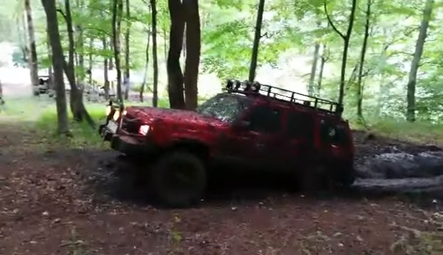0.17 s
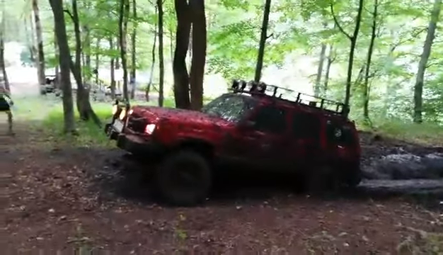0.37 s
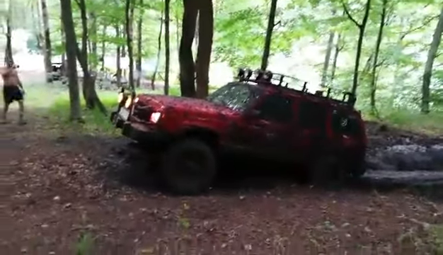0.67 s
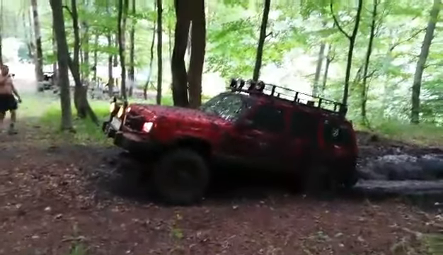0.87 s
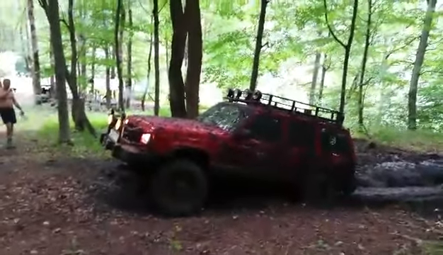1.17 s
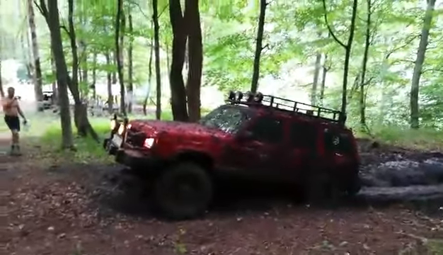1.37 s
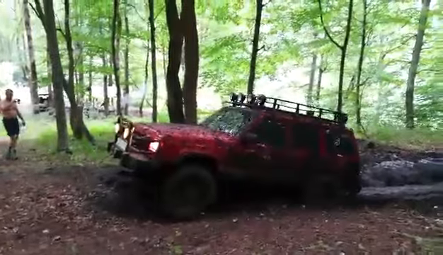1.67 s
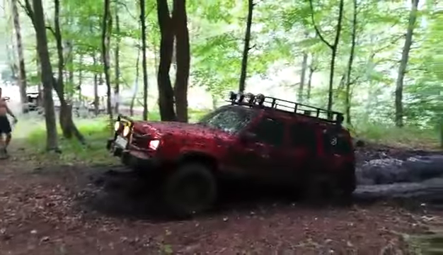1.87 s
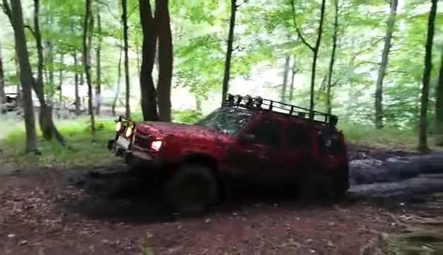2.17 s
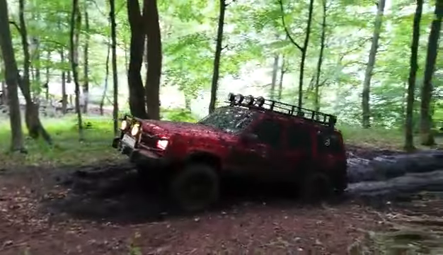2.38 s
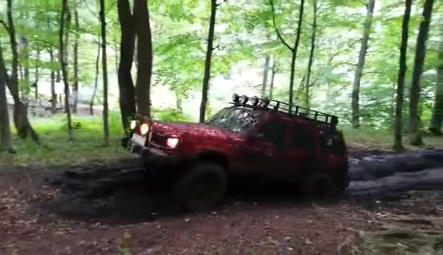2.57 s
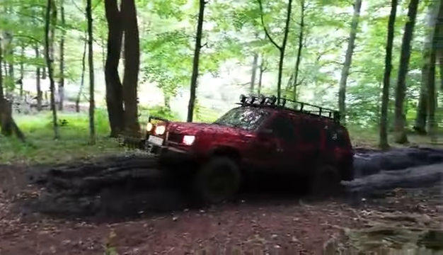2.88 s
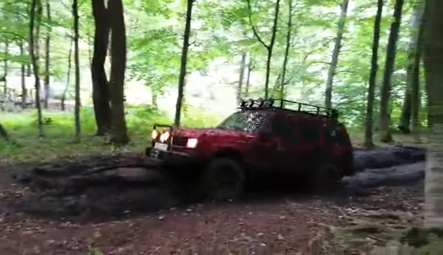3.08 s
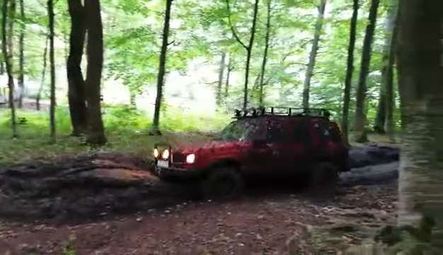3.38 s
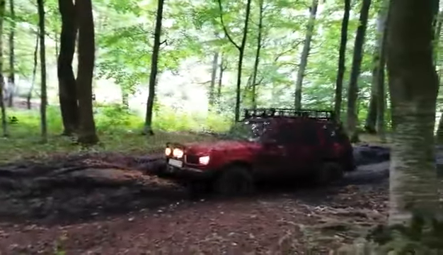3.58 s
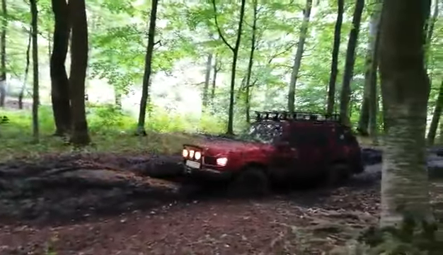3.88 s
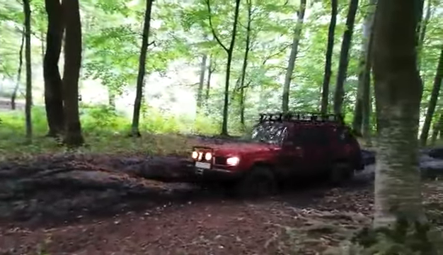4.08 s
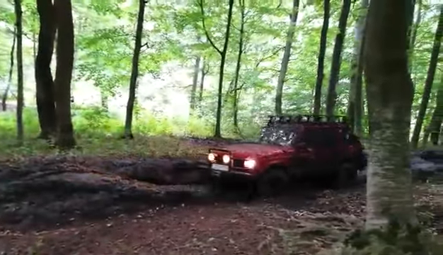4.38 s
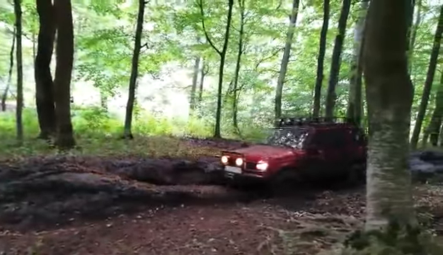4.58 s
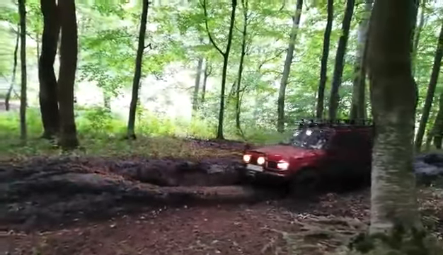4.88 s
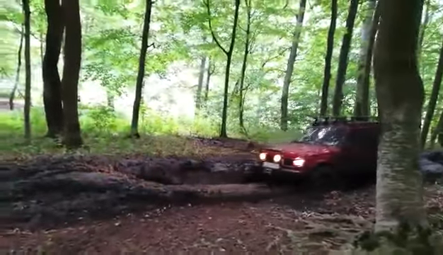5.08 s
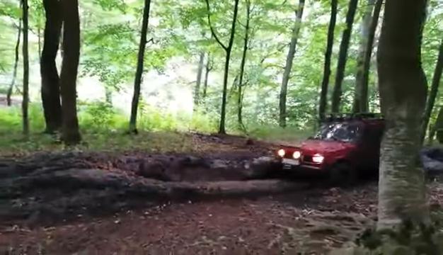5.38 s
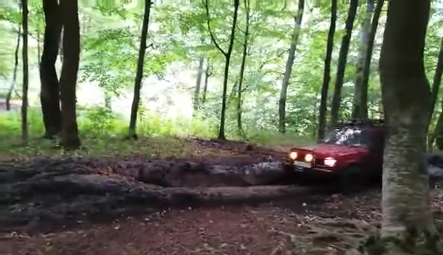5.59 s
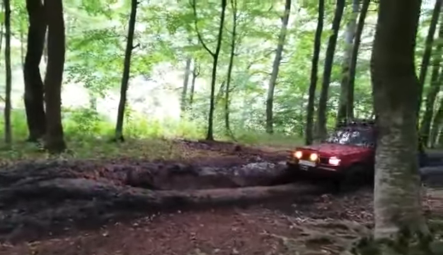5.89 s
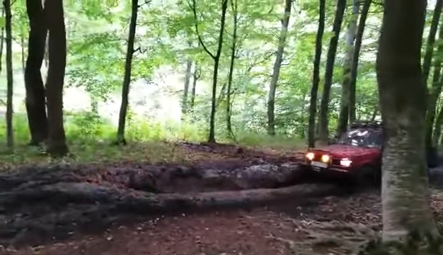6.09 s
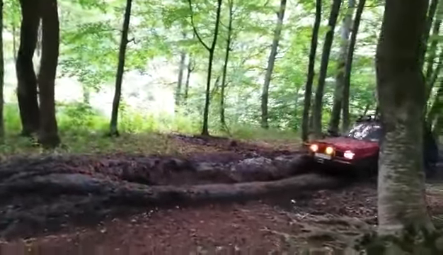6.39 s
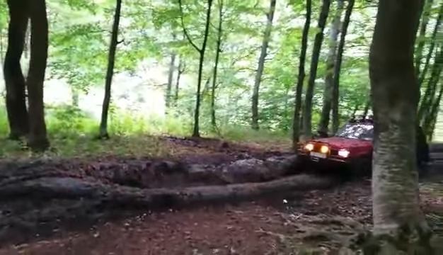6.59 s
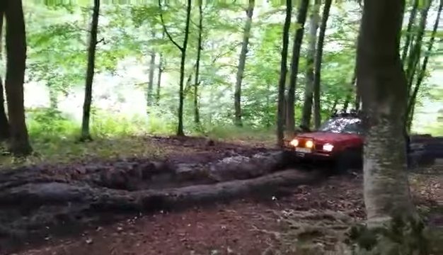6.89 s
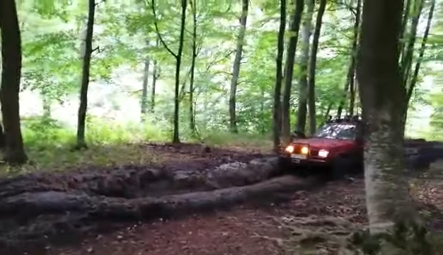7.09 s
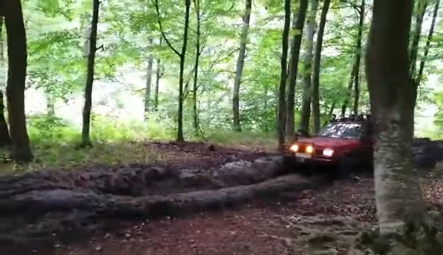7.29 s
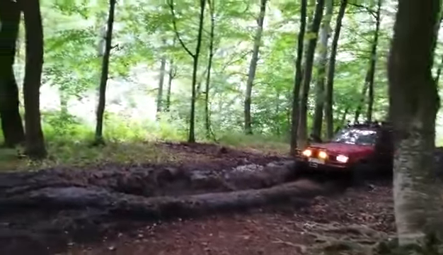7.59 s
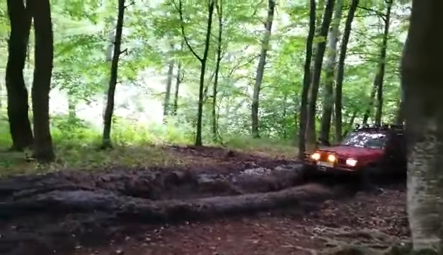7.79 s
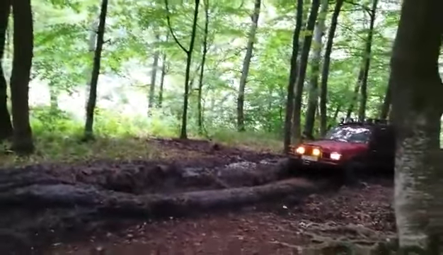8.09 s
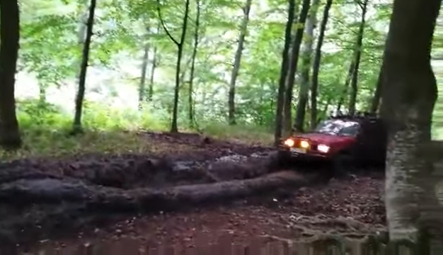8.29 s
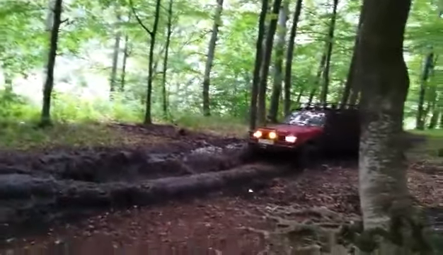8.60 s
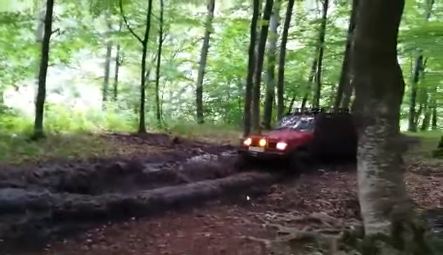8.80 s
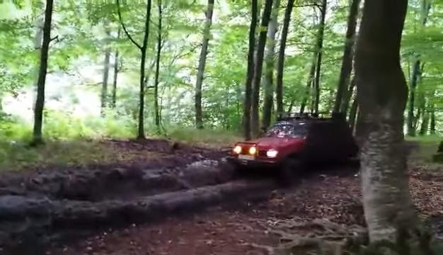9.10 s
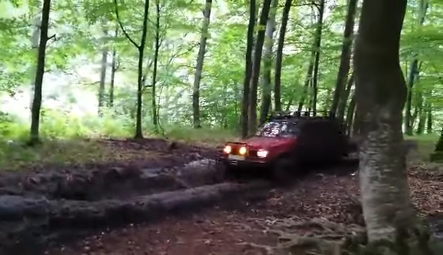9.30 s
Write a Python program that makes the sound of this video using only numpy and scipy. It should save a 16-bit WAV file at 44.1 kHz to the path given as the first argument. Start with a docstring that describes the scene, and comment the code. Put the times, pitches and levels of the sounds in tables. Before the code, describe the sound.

A muddy off-road car idles raggedly, then its six-cylinder engine booms through repeated rising revs and fall-backs, with a few sharp body knocks.

```python
"""A six-cylinder off-road car rocks and reverses through deep mud in a wood, a few metres away.
It idles, burbling raggedly, with buzzing trim that settles within 1 s. Even firings boom near-pure on throttle at
1.1 and 2.6 s; the pipe throbs while coasting from 3 s, and a long pull at 3.6 s climbs past 220 Hz.
Short swells of pipe tone follow the lift at 6 s, then two more pulls at 7.4 and 8.5 s; knocks fall at 0.9, 7.1
and 9.4 s. Throughout, the block clatters with the firings, the intake hisses under a steadier high hiss, a gear
whines and the trees scatter the exhaust."""
import sys
import numpy as np
from scipy import signal
from scipy.fft import rfft, irfft, next_fast_len
from scipy.io import wavfile
from scipy.ndimage import uniform_filter1d, minimum_filter1d

SR = 44100
rng = np.random.default_rng(int(sys.argv[2]) if len(sys.argv) > 2 else 0)


def unload_audio(sound):
    """Save the sound as a 16-bit wav file, at the path given as the first command line argument."""
    columns = np.transpose(np.atleast_2d(sound))
    # keep every value between -1 and 1, then stretch to whole-number steps
    steps = np.round(np.clip(columns, -1, 1) * 32767)
    wavfile.write(sys.argv[1], SR, steps.astype(np.int16))


N = 416304
SIZE = next_fast_len(N)
HZ = np.arange(SIZE // 2 + 1) * SR / SIZE + 1  # FFT bins, kept above 0 for the logarithm
T = np.arange(N) / SR
THUMP_HZ = 64  # silencer

# Foot on the pedal. Each row: pressed at in seconds, lifted at in seconds, change of the second firing
# multiple in dB, of the third in dB, of the intake hiss at the press in dB.
THROTTLE = [(1.147, 2.27, 0.5, -1.5, 1.5), (2.59, 2.78, -3, 6, 1), (3.621, 5.996, 0, 0, 5.5),
            (7.42, 8.297, -2.5, -4.5, -2), (8.496, 9.44, 4.5, 1.5, 0.5)]


def undb(db):
    """Amplitude ratio of a level in dB."""
    return np.exp(np.asarray(db) * np.log(10) / 20)


def unit(x):
    """Scale to an RMS of 1."""
    return x / np.sqrt(np.mean(x ** 2))


def curves(table):
    """Columns of a time table, one value a sample."""
    s, *columns = np.transpose(table)
    return [np.interp(T, s, c) for c in columns]


def over_hz(table):
    """A (Hz, value) table on the FFT bins, interpolated over log frequency."""
    hz, value = np.transpose(table)
    return np.interp(np.log(HZ), np.log(hz), value)


def resonance(x, hz, width_hz):
    """Band-pass of gain 1 at its centre."""
    return signal.lfilter(*signal.iirpeak(hz, hz / width_hz, fs=SR), x)


def gliding_resonance(gas, hz, width_hz):
    """Narrow noise round a moving centre: slow noise rides on a gliding carrier."""
    slow = signal.sosfilt(signal.butter(2, width_hz / 2, fs=SR, output="sos"), gas)
    phase = 2 * np.pi * np.cumsum(hz) / SR
    return slow[0] * np.cos(phase) + slow[1] * np.sin(phase)


def panel_gain(table):
    """Summed resonance peaks of sheet metal or trim on the FFT bins."""
    return sum(undb(db) / (1 + (2 * (HZ - hz) / width_hz) ** 2) for hz, width_hz, db in table)


def wide_noise(gain):
    """Coloured noise, partly alike in the two channels, of overall RMS 1."""
    # Each row: frequency in Hz, likeness of left and right 0-1.
    likeness = [(300, .98), (700, .93), (1400, .75), (2800, .55), (5000, .35), (10000, .2)]
    # Each row: frequency in Hz, phase lead of the left port in radians.
    left_lead = [(300, 0), (1460, -0.1), (2070, -3), (2400, -.5), (3500, -3), (5500, -8)]
    mid, side = rng.standard_normal((2, len(HZ))) + 1j * rng.standard_normal((2, len(HZ)))
    alike = np.clip(over_hz(likeness), 0, 1)
    pair = np.sqrt(1 + alike) * mid + np.sqrt(1 - alike) * side * np.array([[1], [-1]])
    pair[0] *= np.exp(1j * over_hz(left_lead))
    return unit(irfft(pair * gain, SIZE)[:, :N])


def waver(db, rate, t=T):
    """A gain that wanders by about db, rate times a second."""
    knots = np.repeat(rng.standard_normal(int(N / SR * rate) + 2), 8)
    wander_db = 1.4 * db * uniform_filter1d(knots, size=8)
    return np.interp(t, np.arange(len(knots)) / (8 * rate), undb(wander_db))


def partials(table, phase, wander_db, scatter):
    """Wavering multiples of a low phase, RMS 1 in all; scatter 0 starts them all in step."""
    slow = 8  # low tones are computed at every eighth sample
    tone = 0
    for multiple, db in table:
        angle = multiple * phase[::slow] + scatter * rng.uniform(0, 2 * np.pi)
        tone = tone + undb(db) * waver(wander_db, 12, T[::slow]) * np.cos(angle)
    return unit(signal.resample_poly(tone, slow, 1)[:N])


def puffs(firings, depth, scatter_db):
    """A smooth swell for each firing, each of its own size."""
    size = undb(scatter_db * rng.standard_normal(N // 100))[firings.astype(int)]
    return unit(1 - depth + depth * 2 * size * np.sin(np.pi * firings) ** 2)


def pedal():
    """How far each press holds the throttle open, 0-1."""
    press_s, lift_s = .05, .45
    return np.array([np.clip(np.minimum((T - pressed) / press_s, 1 - (T - lifted) / lift_s), 0, 1)
                     for pressed, lifted, *_ in THROTTLE])


def shut():
    """0 with the pedal down, climbing to 1 after each lift."""
    return 1 - pedal().max(axis=0)


def press_hiss_db():
    """The intake hiss starts louder or softer at each press, then settles."""
    settle_s = 1.2
    return sum(db * down * np.exp(-np.maximum(T - s, 0) / settle_s)
               for down, (s, *_, db) in zip(pedal(), THROTTLE))


def trees(exhaust):
    """Trunks send back a short scattered tail, as decaying noise from 15 ms on."""
    level_db, t60_s = -18.5, 0.91
    t = T[:SR]
    trunks = rng.standard_normal((2, len(t))) * undb(-60 * t / t60_s) * (t > .015)
    trunks *= undb(level_db) / np.sqrt(np.sum(trunks[0] ** 2))
    # long waves pass round the trunks
    scattered = signal.sosfilt(signal.butter(2, 300, "high", fs=SR, output="sos"), exhaust)
    return signal.fftconvolve(scattered[None], trunks, axes=1)[:, :N]


def knocks():
    """Short rattling blows, coloured by the body panels."""
    # Sharp knocks on the body. Each row: start in seconds, peak in dB.
    blows = [(.894, -34), (7.079, -41), (7.165, -42), (9.364, -23), (9.411, -24)]
    # Body resonances. Each row: centre in Hz, width in Hz, level in dB.
    body = [(1700, 500, 11.5), (2380, 790, 19.5), (3600, 2000, -0.5)]
    t60_s, rise_s = .09, .003
    t = T[:SR // 8]
    out = np.zeros(N + len(t))
    for s, db in blows:
        rattle = rng.standard_normal(len(t)) * undb(-60 * t / t60_s) * np.tanh(t / rise_s)
        blow = sum(undb(level_db) * unit(resonance(resonance(rattle, hz, width_hz), hz, 2 * width_hz))
                   for hz, width_hz, level_db in body)
        start = int(s * SR)
        out[start:start + len(t)] += undb(db) * blow / np.abs(blow).max()
    return out[:N]


def trim_buzz():
    """Loose trim buzzes at idle and settles: wavering noise through resonances."""
    # Each row: time in seconds, level in dB.
    idle_rattle = [(0, -47.5), (.45, -49.5), (.8, -52), (1.0, -67.5), (9.44, -87)]
    # Each row: centre in Hz, width in Hz, level in dB.
    trim = [(620, 270, -3.5), (775, 88, 1.5), (1050, 490, -10.5), (1370, 130, -6.5)]
    return undb(curves(idle_rattle)[0]) * waver(2.5, 25) * wide_noise(panel_gain(trim))


def hisses(clatter_db, puff):
    """Intake air noise pulsed by the firings, and a steadier high hiss; both levels follow the clatter."""
    # Each row: clatter level in dB, intake hiss level in dB, high hiss level in dB.
    hiss_levels = [(-61, -86, -89), (-54, -84.5, -85.5), (-43.5, -58.5, -57), (-35.5, -45.5, -52),
                   (-28.5, -39, -49), (-32.5, -40.5, -45)]
    # Intake colour. Each row: frequency in Hz, relative density in dB per Hz.
    intake_colour = [(2120, -16.5), (3600, 4), (3940, -5), (4310, -2), (5460, -7.5), (6700, -13),
                     (9220, -5), (10800, -7), (13500, -9), (14500, -6.5), (15200, -23)]
    coast_db, high_hz, high_width_hz = -4, 14000, 2500
    law, *levels = np.transpose(hiss_levels)
    intake_db, high_db = (np.interp(clatter_db, law, db) for db in levels)
    intake_db = intake_db + coast_db * shut() + press_hiss_db()
    intake = undb(intake_db) * waver(1.1, 12) * puff * wide_noise(undb(over_hz(intake_colour)))
    high_gain = np.exp(-((HZ - high_hz) / high_width_hz) ** 2)
    return intake + undb(high_db) * waver(1.6, 12) * wide_noise(high_gain)


def clatter(clatter_db, puff):
    """Block noise and rattling sheet metal, changing colour as the car backs off."""
    # Each row: time in seconds, how far the car has backed off 0-1.
    backing = [(0, 0), (2.5, 0.23), (4, 0.68), (6, 1), (9.44, 0.85)]
    # Near colour. Each row: frequency in Hz, relative density in dB per Hz.
    near_colour = [(250, -33.5), (420, -7.5), (540, -5), (713, -3), (786, 3.5), (865, -9), (1050, -10.5),
                   (1280, -13.5), (1460, -16), (1830, -6), (2080, -16.5), (2470, -10), (2750, -10.5),
                   (3810, -22.5), (4200, -36.5), (5460, -54.5), (9240, -120)]
    # Far colour. Each row: frequency in Hz, relative density in dB per Hz.
    far_colour = [(250, -32.5), (420, -5.5), (445, -10), (509, -9.5), (566, -6.5), (661, -7), (865, -8),
                  (1110, -12), (1560, -9.5), (1940, -11), (2400, -15.5), (2970, -17), (4200, -28.5),
                  (5460, -66.5), (9240, -120)]
    # Rattling sheet metal. Each row: centre in Hz, width in Hz, level in dB.
    panels = [(780, 58, 1.5), (1400, 110, 0), (1690, 80, -11.5), (2410, 460, -0.5), (3200, 400, -13.5)]
    panels_db = -4.5  # over the near clatter
    away = np.clip(curves(backing)[0], 0, 1)
    near = wide_noise(undb(over_hz(near_colour)))
    far = wide_noise(undb(over_hz(far_colour)))
    rattle = undb(panels_db) * waver(1.1, 25) * wide_noise(panel_gain(panels))
    colour = np.sqrt(1 - away) * (near + rattle) + np.sqrt(away) * far
    return undb(clatter_db) * waver(0.98, 14) * puff * colour


def block(firings, hz):
    """Clatter and intake hiss swell with each firing; the swells blur together at high revs."""
    # Each row: time in seconds, clatter level in dB.
    block_level = [(0, -51), (.4, -53), (.85, -56), (1.2, -54.5), (1.26, -45.5), (1.31, -38.5), (1.5, -37),
                   (1.78, -31.5), (2.1, -34.5), (2.35, -37), (2.6, -43), (2.67, -31.5), (2.77, -32),
                   (2.86, -40.5), (3.15, -41.5), (3.36, -35.5), (3.61, -40.5), (3.76, -27), (3.87, -33),
                   (4.1, -35.5), (5.0, -33), (5.95, -30.5), (6.1, -33.5), (6.42, -36), (7.15, -42),
                   (7.46, -42), (7.55, -32.5), (7.63, -34), (7.74, -36.5), (8.2, -34), (8.85, -35.5),
                   (9.23, -33.5), (9.36, -30)]
    clatter_db = curves(block_level)[0]
    puff = puffs(firings, np.clip(18 / hz, 0, 1), 2.5)
    return clatter(clatter_db, puff) + hisses(clatter_db, puff) + trim_buzz()


def gear_whine():
    """Meshing teeth of two gear pairs sing as wavering sines."""
    # Each row: time in seconds, pitch in Hz, level in dB.
    whine_track = [(0, 1443, -83), (4.0, 1517, -60.5), (4.6, 1724, -62), (5.1, 1890, -41),
                   (5.35, 1953, -46), (5.9, 1979, -40.5), (6.05, 1856, -40), (6.3, 1586, -70.5),
                   (8.3, 1523, -71.5), (8.6, 1501, -49.5), (8.9, 1512, -45.5), (9.05, 1596, -46),
                   (9.44, 1560, -45)]
    second_ratio, second_db = .665, -10
    whine_hz, whine_db = curves(whine_track)
    teeth = 2 * np.pi * np.cumsum(whine_hz * waver(.1, 40)) / SR
    first = waver(4, 14) * np.sin(teeth)
    second = undb(second_db) * waver(3, 14) * np.sin(second_ratio * teeth)
    return np.sqrt(2) * undb(whine_db) * (first + second)


def crank_tones(turn):
    """Weaker multiples of the crank rate; the manifold favours some of the upper ones."""
    # Each row: multiple of the crank rate (a third of the firing rate), relative level in dB.
    crank = [(1, -23.5), (1.5, -23.5), (2, -13), (2.5, -24), (3.5, -23.5), (4, -21), (4.5, -19.5), (5, -17),
             (7, -24), (8, -16.5), (9, -23), (10, -33), (11, -18), (12, -26), (13, -22.5), (14, -21.5),
             (15, -34), (16, -28.5)]
    # Each row: time in seconds, level under the sixth multiple in dB, level over it in dB.
    load = [(0, -61.5, -50.5), (1.3, -35, -47), (1.9, -44.5, -47), (2.3, -36, -40.5), (2.9, -46.5, -34),
            (3.6, -52, -33), (4.1, -31, -38.5), (4.5, -35.5, -32.5), (4.9, -32.5, -39), (5.3, -25, -35),
            (5.9, -27.5, -29.5), (6.05, -33, -41.5), (6.3, -31.5, -47.5), (7.4, -42, -51.5),
            (7.8, -31.5, -47.5), (8.2, -27.5, -33), (8.7, -35, -51.5), (9.1, -36, -32.5),
            (9.44, -26.5, -28.5)]
    # Manifold resonances. Each row: centre in Hz, width in Hz, gain in dB.
    manifold = [(390, 110, -5), (600, 110, -0.5), (835, 260, -3)]
    low = partials([row for row in crank if row[0] < 6], turn, 2.7, 0.7)
    high = partials([row for row in crank if row[0] > 6], turn, 1.8, 1)
    favoured = sum(undb(db) * resonance(high, hz, width_hz) for hz, width_hz, db in manifold)
    low_db, high_db = curves(load)
    return undb(low_db) * low + undb(high_db) * favoured


def pipe_swells():
    """Short swells of pipe tone over a low thump, around lifts and as the throttle opens at 7.4 s."""
    # Each row: centre in seconds, level in dB, pitch in Hz, length in seconds.
    swell_rows = [(2.4, -18, 187.7, .04), (6.08, -11, 139.3, .04), (6.58, -11, 144, .015),
                  (6.65, -15, 154, .015), (7.01, -12, 159, 0.032), (7.11, -12.5, 167, 0.03),
                  (7.31, -12.5, 164, 0.014), (7.38, -13, 182, 0.02), (7.47, -7.5, 202.3, .04)]
    thump_db = -8.5
    out = np.zeros(N)
    for s, db, hz, length_s in swell_rows:
        t = T - s
        tone = np.sin(2 * np.pi * hz * t)
        thump = undb(thump_db) * np.cos(2 * np.pi * THUMP_HZ * t)
        out += undb(db) * np.exp(-(t / length_s) ** 2) * (tone + thump)
    return out


def throb(firings):
    """Coasting, one cylinder a cycle pops harder: neighbouring tones line up once a cycle, then cancel."""
    # Each row: time in seconds, level in dB.
    throb_level = [(2.9, -55), (3.0, -21), (3.2, -15), (3.45, -11.5), (3.65, -12.5), (3.8, -22),
                   (3.9, -44.5)]
    # Each row: multiple of the six-firing cycle, relative level in dB.
    throb_tones = [(3, -22.5), (8, -15.5), (9, -1.5), (10, 0.5), (11, -20), (14, -26.5), (15, -30),
                   (19, -28), (20, -17)]
    peak_s = 3.415  # moment of one beat
    cycle = 2 * np.pi * (firings - firings[int(peak_s * SR)]) / 6
    return undb(curves(throb_level)[0]) * partials(throb_tones, cycle, 0.61, 0)


def burble(firings):
    """Ragged gas, pushed by the firings, rings two pipe resonances and the silencer."""
    # Each row: time in seconds, level in dB, upper resonance over it in dB.
    gas_flow = [(0, -12.5, -9), (.4, -10, -13.5), (1.0, -13.5, -18.5), (1.25, -15, -14),
                (1.45, -19.5, -8.5), (1.8, -25.5, 0.5), (2.25, -25.5, -0.5), (2.8, -20, -13.5),
                (3.0, -28, -14), (3.55, -25.5, -4), (3.72, -21, -0.5), (4.2, -36.5, -14),
                (5.0, -39.5, -2.5), (5.95, -27.5, -7), (6.4, -20, -11.5), (6.85, -21.5, -10),
                (7.05, -17, -17.5), (7.45, -14, -15.5), (7.7, -28.5, -6.5), (8.2, -34, -10), (8.7, -31, 3),
                (9.44, -36, -1.5)]
    pipe_hz, pipe_width_hz, pipe_waver_db = 171, 40.7, 0.66
    upper_hz, upper_width_hz = 310, 103
    thump_width_hz, thump_db, coast_thump_db = 43, -15, 2.5
    level_db, upper_db = curves(gas_flow)
    gas = puffs(firings, 0.43, 0.75) * rng.standard_normal((4, N))
    pipe = gliding_resonance(gas[[0, 3]], pipe_hz * waver(pipe_waver_db, 5), pipe_width_hz)
    # strong swings lose more to turbulence, which evens out the ringing
    swing = uniform_filter1d(uniform_filter1d(unit(pipe) ** 2, size=500), size=500)
    pipe = pipe / (swing + .08) ** .3
    upper = resonance(resonance(gas[1], upper_hz, upper_width_hz), upper_hz, upper_width_hz)
    thump = resonance(resonance(gas[2], THUMP_HZ, thump_width_hz), THUMP_HZ, thump_width_hz)
    thump = undb(thump_db + coast_thump_db * shut()) * unit(thump)
    ringing = undb(level_db) * (unit(pipe) + undb(upper_db) * unit(upper) + thump)
    # the silencer swallows what lies above the pipe resonances
    return signal.sosfilt(signal.butter(6, 420, fs=SR, output="sos"), ringing)


def boom(turn, hz, boom_db):
    """The even firing tone, with its second and third multiples as the pipe passes them."""
    # Each row: frequency of the multiple in Hz, level as a second in dB, level as a third in dB.
    overtones = [(101, -17.5, -30), (126, -10.5, -18.5), (150, -7, -8), (203, -17, -18),
                 (236, -20.5, -35.5), (262.6, -20.5, -35), (311, -29.5, -29.5), (350, -26.5, -24.5),
                 (378.6, -29.5, -31), (410, -35, -41.5), (453, -36.5, -48), (590, -40, -42.5),
                 (674, -40, -37)]
    full_boom_db, follow = -8, 0.31  # multiples sink by this share of the boom's fall
    coast_second_db, coast_third_db = -9, -6.5  # with the throttle shut
    pipe_hz, second_db, third_db = np.transpose(overtones)
    sink_db = follow * np.minimum(boom_db - full_boom_db, 0)
    press_db = np.transpose(THROTTLE)[2:4] @ pedal()
    out = undb(boom_db) * waver(1.2, 30) * np.sin(3 * turn)
    for k, db, coast_db in ((2, second_db, coast_second_db), (3, third_db, coast_third_db)):
        level_db = np.interp(k * hz, pipe_hz, db) + sink_db + press_db[k - 2] + coast_db * shut()
        out = out + undb(level_db) * waver(3, 14) * np.sin(3 * k * turn + k - 1)
    return np.sqrt(2) * out


def scene():
    """Exhaust reaches the right port first; block noise and the trees' tail join it."""
    # Each row: time in seconds, firing rate in Hz, boom level in dB.
    engine = [(0, 50.16, -20.5), (.85, 54.72, -29.5), (1.2, 53.94, -23.5), (1.3, 60.67, -7.5),
              (1.5, 87, -12), (1.8, 120, -8), (2.1, 148, -6), (2.28, 162.4, -7), (2.34, 159.7, -18),
              (2.42, 146.1, -12), (2.57, 128, -27.5), (2.63, 126.4, -16.5), (2.8, 138.8, -16),
              (2.87, 134.6, -31.5), (3.05, 116.7, -32.5), (3.5, 114.9, -31), (3.61, 110.1, -25),
              (3.72, 119.3, -12), (3.94, 140.9, -6.5), (4.2, 165, -5), (4.5, 189.9, -5.5),
              (4.9, 206.2, -6.5), (5.28, 221.5, -10.5), (5.93, 223, -15.5), (6.03, 212, -15),
              (6.15, 188.9, -4.5), (6.45, 153, -6.5), (6.55, 144.7, -16), (6.92, 124.4, -25),
              (7.28, 107.7, -33), (7.45, 96.5, -30.5), (7.56, 116, -9), (7.78, 157.5, -4.5),
              (7.98, 194.8, -7), (8.12, 212.5, -7.5), (8.26, 206, -4.5), (8.5, 167, -7.5),
              (8.65, 146, -9.5), (8.85, 136.1, -14.5), (9.18, 131.5, -15), (9.3, 127, -15),
              (9.44, 132.5, -15.5)]
    # Each row: time in seconds, lag of the left port in ms, wandering over time.
    left_lag = [(0, 0.051), (3, 0.14), (4.5, 0.13), (8, 0.00075), (9.44, .12)]
    hz, boom_db = curves(engine)
    firings = np.cumsum(hz) / SR  # running count
    turn = 2 * np.pi * firings / 3  # crank angle in radians
    exhaust = knocks() + gear_whine() + crank_tones(turn) + pipe_swells()
    exhaust = exhaust + throb(firings) + burble(firings) + boom(turn, hz, boom_db)
    late = np.interp(T - curves(left_lag)[0] / 1000, T, exhaust)
    return np.array([late, exhaust]) + block(firings, hz) + trees(exhaust)


def record(dry):
    """Two microphone ports colour and hiss; deep bass is cut, a limiter holds peaks, then the top is cut."""
    # Each row: frequency in Hz, left minus right in dB.
    port_db = [(60, 0.5), (110, 0.5), (200, 0.5), (380, 2.5), (690, 2.5), (1280, 7), (2350, 6),
               (4340, -0.5), (8000, 14.5), (14800, -9.5)]
    # Hiss colour. Each row: frequency in Hz, relative density in dB per Hz.
    self_noise = [(2650, -39), (4500, -7.5), (5750, -15.5), (8330, -19), (11100, -7.5), (13500, 2.5),
                  (15200, -1)]
    self_noise_db, limit, limit_s, top_hz = -67.5, .97, .012, 15100
    tilt = undb(over_hz(port_db) / 2 * np.array([[1], [-1]]))
    x = dry + undb(self_noise_db) * wide_noise(undb(over_hz(self_noise)))
    x = irfft(rfft(x, SIZE) * tilt, SIZE)[:, :N]
    x = signal.sosfilt(signal.butter(4, 42, "high", fs=SR, output="sos"), x)
    span = int(limit_s * SR)
    room = minimum_filter1d(limit / np.maximum(np.abs(x).max(axis=0), limit), size=2 * span)
    x = x * uniform_filter1d(room, size=span)
    return signal.sosfilt(signal.ellip(10, .2, 70, top_hz, fs=SR, output="sos"), x)


dry = scene()
out = record(dry)
unload_audio(out)
```